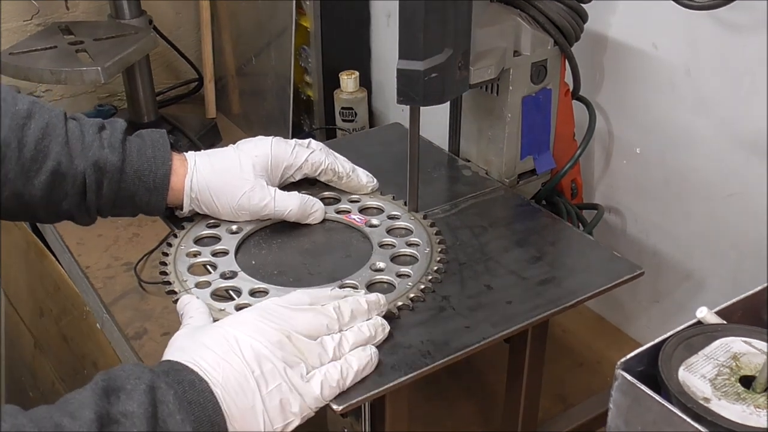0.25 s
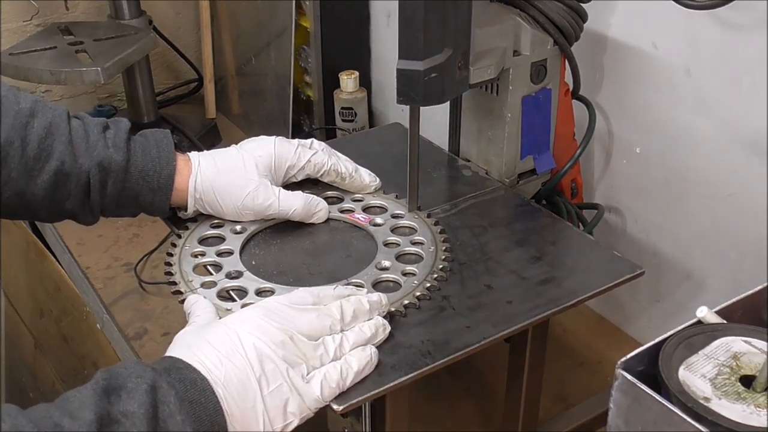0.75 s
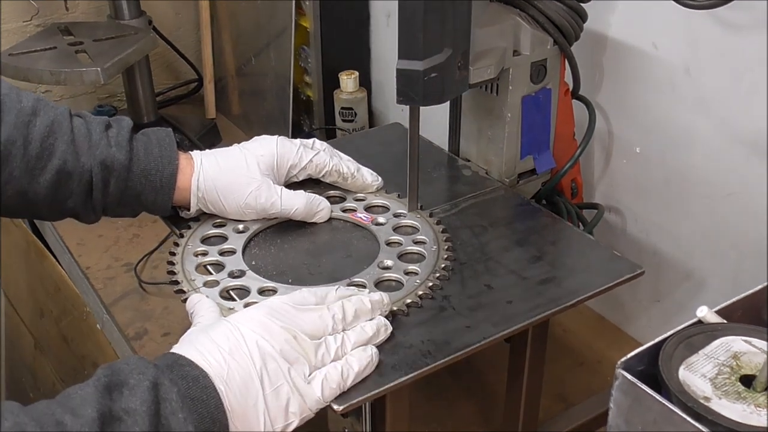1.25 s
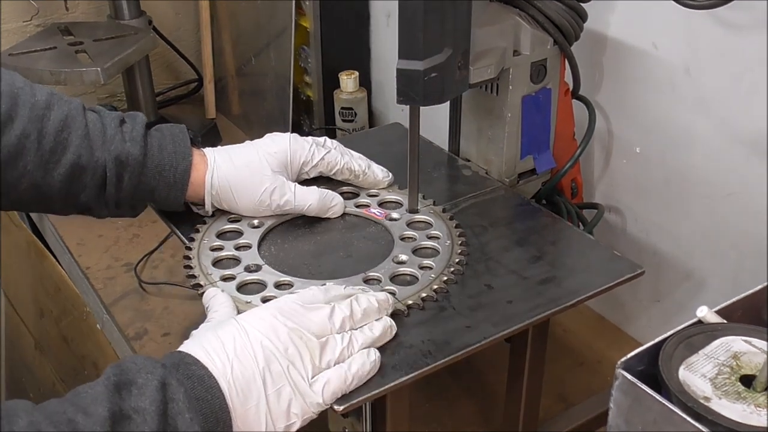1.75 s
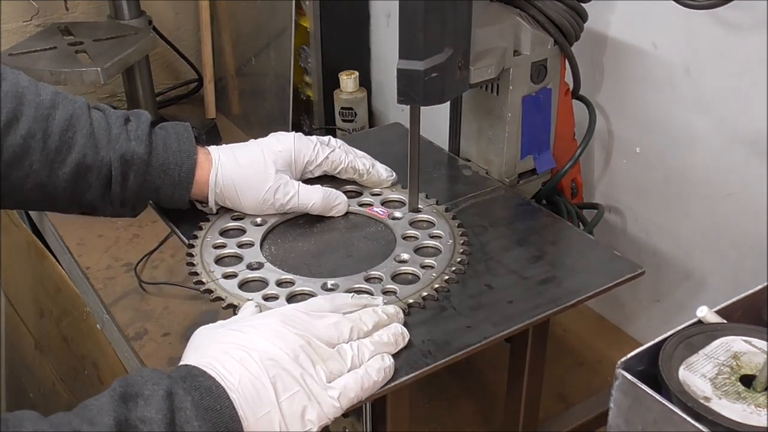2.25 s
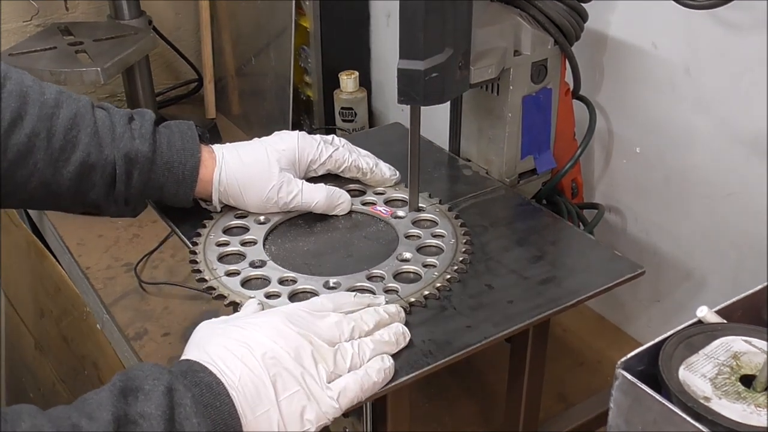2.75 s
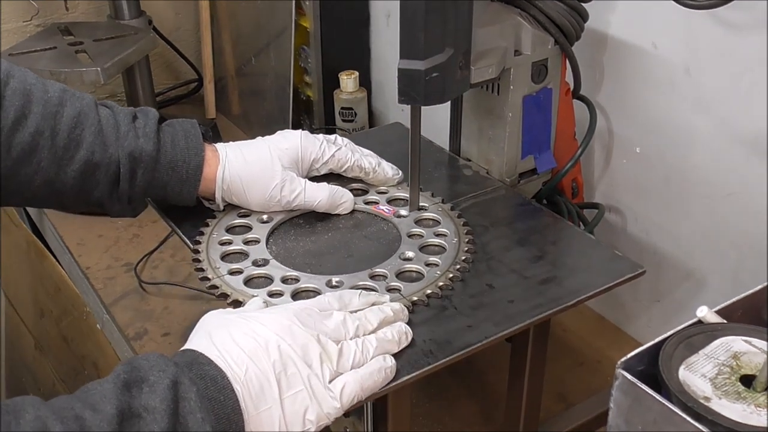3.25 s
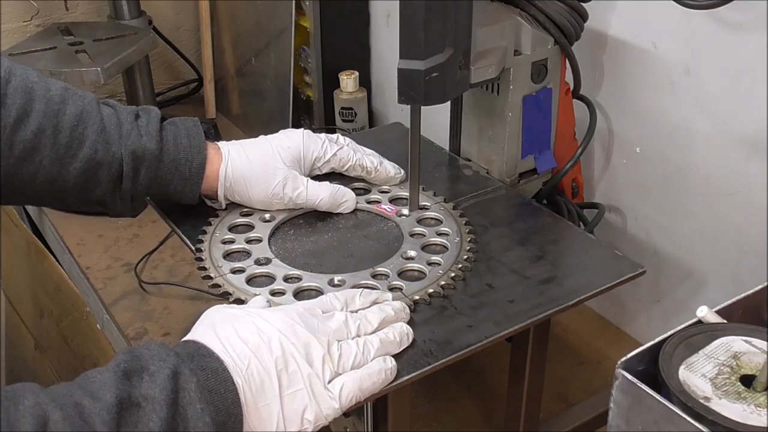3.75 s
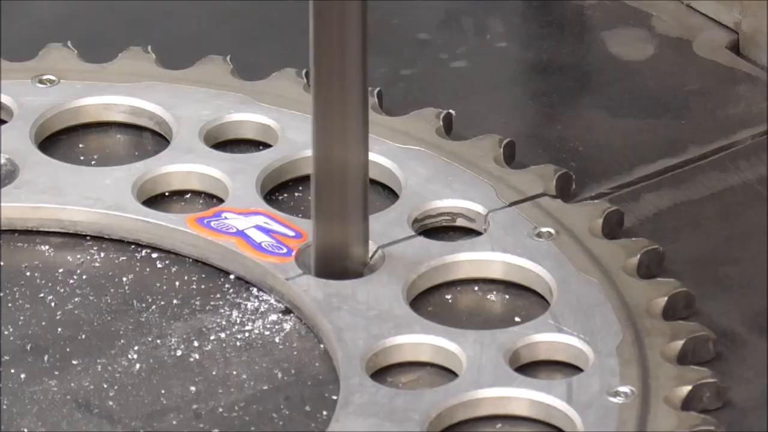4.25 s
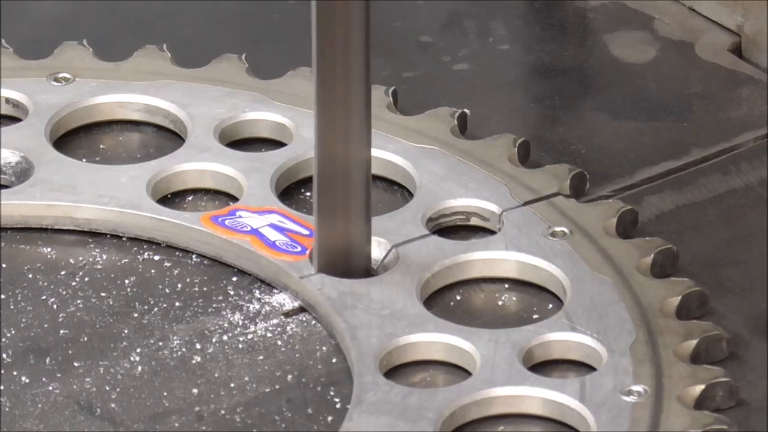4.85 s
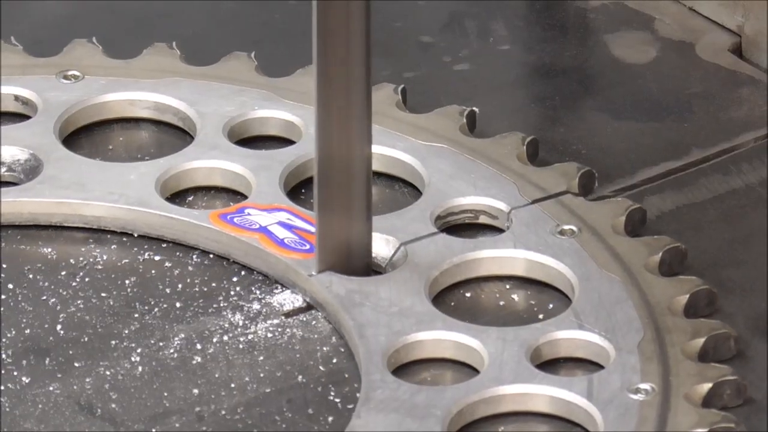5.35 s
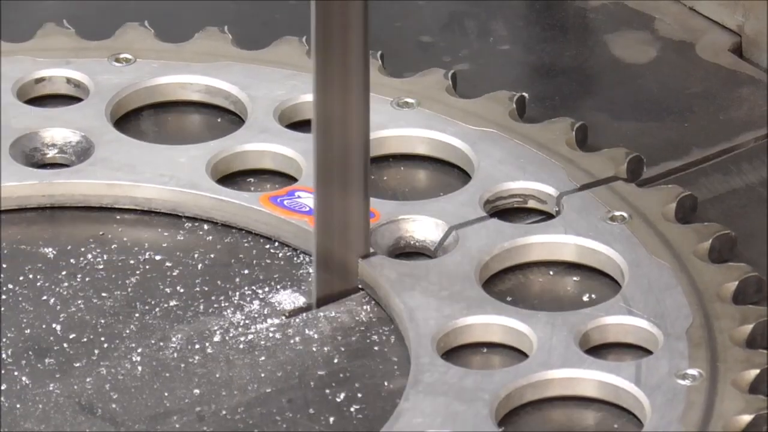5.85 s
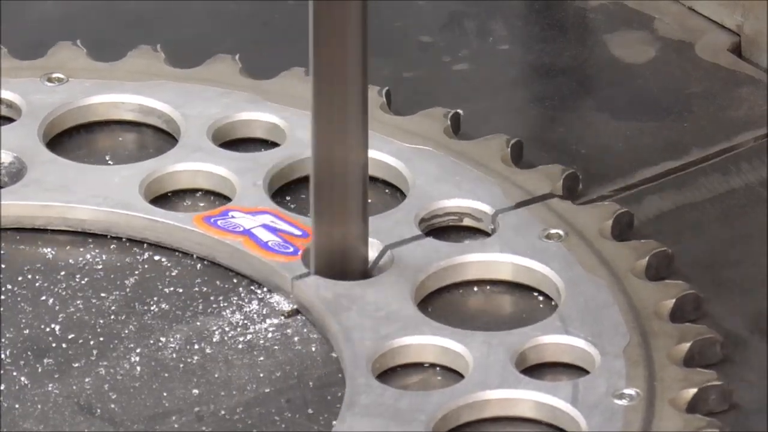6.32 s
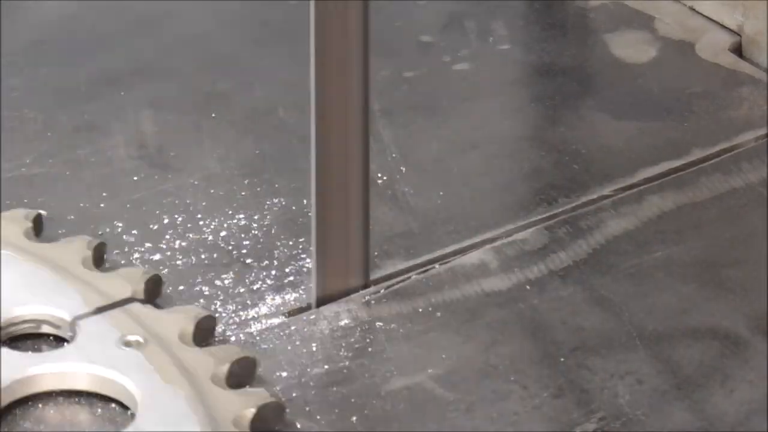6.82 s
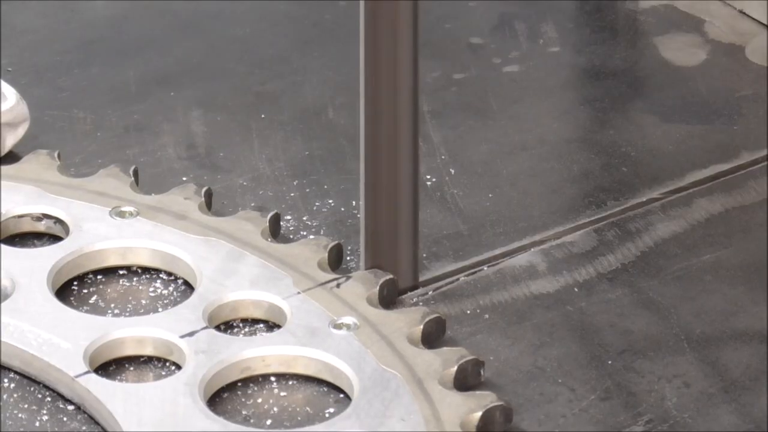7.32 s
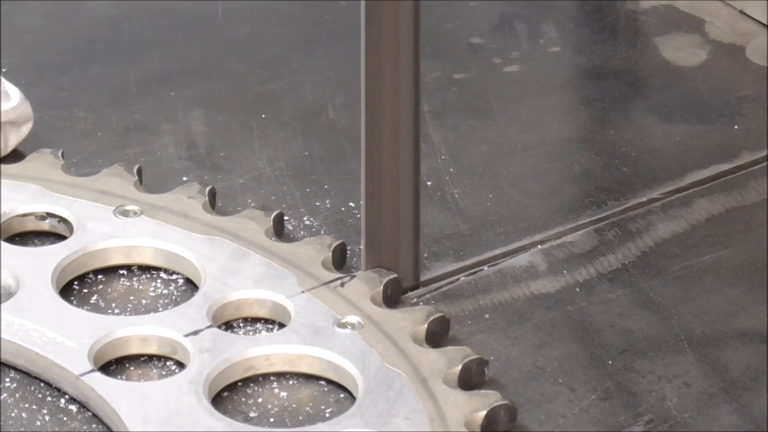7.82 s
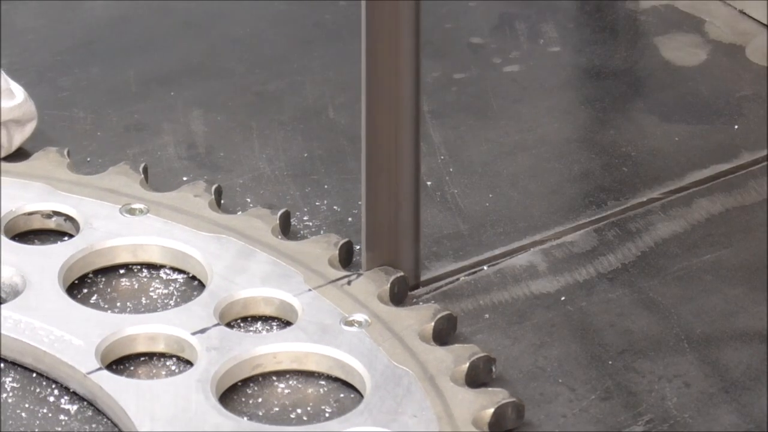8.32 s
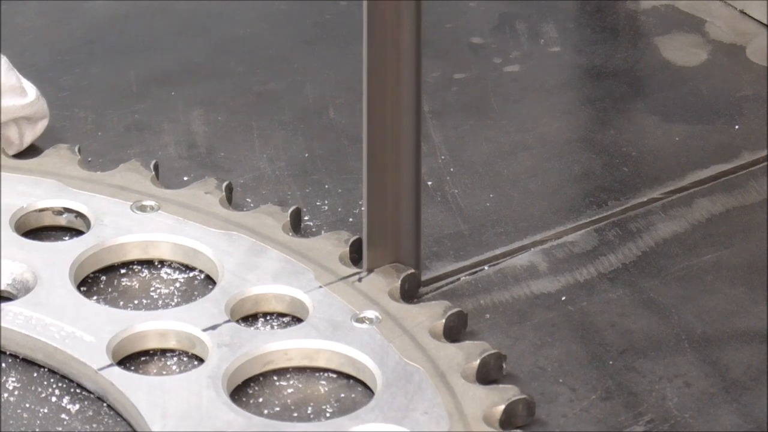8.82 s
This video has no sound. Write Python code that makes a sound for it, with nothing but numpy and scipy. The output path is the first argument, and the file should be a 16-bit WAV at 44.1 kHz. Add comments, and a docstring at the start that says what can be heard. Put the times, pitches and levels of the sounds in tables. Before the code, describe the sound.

A band saw whines and rasps through a metal sprocket, squealing as the blade binds, then suddenly sounds closer and brighter.

```python
"""A portable band saw, upright at a steel table, cuts a metal sprocket in a small workshop.
From a step away, the teeth whine at their passing rate and rasp through the resonances of blade and
table, over the buzz of the speed control. Almost at once the blade binds and squeals by stick-slip
friction; then the loosely held sprocket rattles. At 4.3 s the listening point jumps close. A high
blade mode whistles, the rattle comes and goes, and from 7.5 s the blade binds and squeals again."""
import sys
import numpy as np
from scipy import signal
from scipy.fft import rfft, irfft
from scipy.io import wavfile
from scipy.ndimage import uniform_filter1d

SR = 44100
rng = np.random.default_rng(int(sys.argv[2]) if len(sys.argv) > 2 else 0)


def transcribe(signal):
    """Save signal, clipped to [-1, 1], as a 16-bit WAV file at the path in sys.argv[1]."""
    frames = np.atleast_2d(signal).T
    limited = np.clip(frames, -1, 1)
    pcm = np.round(limited * 32767).astype(np.int16)
    wavfile.write(sys.argv[1], SR, pcm)


N = 400428
TIME, FREQ = np.arange(N) / SR, np.fft.rfftfreq(N, 1 / SR)
CLOSE_FROM_S, BIND_EDGE_S, RATTLE_EDGE_S = 4.299, .012, .03
TOOTH_HZ, BUZZ_HZ = 1365.2, 240.05


def amp(db):
    """Decibels to amplitude ratio."""
    return 10 ** (np.asarray(db) / 20)

def unit(x):
    """Normalisation to rms 1."""
    return x / np.sqrt(np.mean(x ** 2) + 1e-20)

def curve(rows):
    """Linear interpolation of a time table at every sample."""
    return np.interp(TIME, *np.transpose(rows))

def colour(points):
    """Interpolation of a spectrum table over log frequency."""
    hz, db = np.transpose(points)
    return np.interp(np.log(FREQ + 1), np.log(hz + 1), db)

def shaped(x, gain):
    """Zero-phase filtering by a gain for every frequency."""
    return irfft(rfft(x) * gain, N)

def wander(hz):
    """Random modulation: low-passed noise of rms 1."""
    return unit(shaped(rng.standard_normal(N), 1 / (1 + (FREQ / hz) ** 4)))

def ring(x, hz, width):
    """Resonance: x through one steep-sided peak, at rms 1."""
    return unit(shaped(x, 1 / (1 + ((FREQ - hz) / (0.37 * width)) ** 2)))

def angle(hz):
    """Phase as the integral of frequency."""
    return 2 * np.pi * np.cumsum(hz) / SR

def spell(start, end, edge):
    """A soft-edged gate, open from start to end."""
    return (np.tanh((TIME - start) / edge) - np.tanh((TIME - end) / edge)) / 2

def lagged(x, seconds):
    """First-order lag with this time constant."""
    pole = np.exp(-1 / (seconds * SR))
    return x[0] + signal.lfilter([1 - pole], [1, -pole], x - x[0])

def diffused(x, t60):
    """Diffusion: convolution with a decaying noise tail of energy 1."""
    t = TIME[:SR // 6]
    tail = rng.standard_normal(len(t)) * amp(-60 * t / t60)
    return signal.fftconvolve(x, tail / np.linalg.norm(tail))[:N]


# The push of the work into the teeth. Each row: time in seconds, load in dB.
PUSH = [(0, -2), (.69, -3.5), (.79, 0.2), (3.4, -0.28), (4.15, 0.64), (4.6, -0.6), (5.4, -0.22),
        (7.52, 0.82), (7.76, -5.5), (8.4, -7.5), (8.92, -0.5), (9.08, -1)]
# The teeth lose their bite. Each row: time in seconds, depth in dB, recovery in seconds.
LOST_BITES = [(0.405, 6.5, 0.042), (2.63, 2.5, 0.016), (2.725, 2, 0.041), (3.9, 4.5, 0.078),
              (5.885, 10.5, 0.0295), (6.65, 3.5, 0.038), (7.618, 0.5, .02), (8.6, 6, 0.03)]

def feed(let_go_s=.013):
    """Cutting load in dB: the push of the hands, with exponential recovery from each lost bite."""
    lost_db = sum(db * np.exp(-np.where(TIME < s, ((TIME - s) / let_go_s) ** 2, (TIME - s) / recovery))
                  for s, db, recovery in LOST_BITES)
    return curve(PUSH) - lost_db

def tooth_rate(feed_db, governor_s=0.1515, inertia_s=0.05, sag_hz_per_db=3.0, drag_hz=5.5):
    """Governed speed: a load change pulls the rate until the control catches up; friction lowers it."""
    load_change_db = lagged(feed_db - lagged(feed_db, governor_s), inertia_s)
    peak_s, period_s, swing_hz = 1.49, .48, 12.32  # the speed hunts for a moment
    hunting = spell(peak_s - .25 * period_s, peak_s + 1.5 * period_s, period_s / 10)
    hunt = swing_hz * np.cos(2 * np.pi * (TIME - peak_s) / period_s) * hunting
    friction = flank_friction()
    drag = drag_hz * friction / friction.max()
    return TOOTH_HZ - sag_hz_per_db * load_change_db - drag + hunt + 1.28 * wander(4.23)


# Broad spectrum of the rasp. Each row: frequency in Hz, relative density in dB.
RASP_SPECTRUM = [(30, -53), (170, -52), (300, -46.5), (500, -27), (760, -19.5), (950, -7.5), (1500, -9.5),
                 (2600, -5.5), (4400, 1.23), (6600, -1.67), (8500, -3), (10200, -9), (12500, -4),
                 (15700, -3.5)]
# Modes of table, housing, sprocket and blade. Each row: frequency in Hz, width in Hz, boost in dB.
BODY_MODES = [(223, 48, 8.5), (343, 80, 7), (578, 45, 5.5), (972, 81, 2), (1296, 323, 9), (1627, 118, 8),
              (1871.5, 225, 15), (2072, 118, 6.5), (2318, 303, 9), (2730, 90, 8), (3044, 421, 12.5),
              (3385, 200, 8.5), (3715, 230, 4.5), (4070, 380, 4), (4933, 440, 7.5), (5760, 720, 4),
              (6110, 170, 3), (6860, 110, 5.5), (7620, 310, 4.5), (8140, 64, 6), (13050, 640, 1.5),
              (14420, 420, 10), (15500, 290, 10.5), (15800, 178, 9)]
# Treble hiss against the rest of the rasp. Each row: time in seconds, gain in dB.
HISS_GAIN = [(0, .6), (2.9, -0.5), (4.4, 1.6), (7.65, 1), (8, 3.5), (8.38, 5), (8.65, -.5)]

def rasp(tooth_phase, feed_db, level_db=-20.5, body_hz=2600, hiss_hz=9000):
    """Forced vibration: each tooth tears a chip, and the scrape of noise rings saw and table."""
    chips = rng.standard_normal(N) * (1 + 0.26 * np.cos(tooth_phase))
    chips = chips + amp(-12) * diffused(chips, t60=0.14)  # the many small modes of the steel plate
    peaks_db = sum(db * 2 ** (-(2 * (FREQ - hz) / width) ** 2) for hz, width, db in BODY_MODES)
    scrape = unit(shaped(chips, amp(colour(RASP_SPECTRUM) + peaks_db)))
    low = 1 / (1 + (FREQ / body_hz) ** 8)
    high = 1 - 1 / (1 + (FREQ / hiss_hz) ** 8)
    # the treble throbs with the pulses of motor current
    throb = (1 + .12 * np.cos(2 * np.pi * 2 * BUZZ_HZ * TIME)) * amp(0.7 * wander(45))
    hiss = shaped(scrape, high) * amp(curve(HISS_GAIN)) * throb
    body = shaped(scrape, low) * amp(-0.68) + shaped(scrape, 1 - low - high)
    flutter_db = 0.52 + 0.13 * np.maximum(-feed_db, 0)  # under a light feed the teeth skip
    return (body + hiss) * amp(level_db + feed_db + flutter_db * wander(16.4))


# Overtones of the tooth strikes. Each row: harmonic number, relative level in dB.
TOOTH_HARMONICS = [(2, -46), (3, -36.5), (5, -58), (6, -39.5)]

def whine(tooth_phase, feed_db, hum_db=-39.5, shimmer_db=2):
    """Periodic impacts give a harmonic series; harder feed sharpens them and lifts the overtones."""
    loose_db = sum(db * spell(start, end, RATTLE_EDGE_S) for start, end, _, _, db in RATTLES)
    hum = amp(hum_db + .55 * feed_db + loose_db + shimmer_db * wander(11)) * np.sin(tooth_phase)
    overtones = sum(amp(db + shimmer_db * wander(21)) * np.sin(k * tooth_phase)
                    for k, db in TOOTH_HARMONICS)
    return np.sqrt(2) * (hum + overtones * amp(2 + 1.04 * feed_db))


# Spectral lines of the motor buzz. Each row: harmonic number, relative level in dB.
BUZZ_HARMONICS = [(2, -70), (8, -66), (10, -43), (12, -46), (24, -47), (26, -52), (30, -50), (45, -55),
                  (49, -56), (51, -51), (57, -50), (59, -55), (61, -47.5), (63, -54)]

def buzz(feed_db, level_db=-1, shimmer_db=0.3, strain=2.3):
    """Current chopped by the speed control gives harmonics of steady pitch that grow with the load."""
    phase = 2 * np.pi * BUZZ_HZ * TIME
    load_db = uniform_filter1d(feed_db, size=SR // 5)
    lines = sum(amp(db - shimmer_db * wander(7.3)) * np.sin(k * phase + 2 * np.pi * rng.random())
                for k, db in BUZZ_HARMONICS)
    return np.sqrt(2) * amp(level_db + strain * load_db) * lines


# Background noise of the workshop. Each row: frequency in Hz, relative density in dB.
RUMBLE_SPECTRUM = [(20, 2), (60, 0), (150, -7), (400, -20), (2000, -45)]

def rumble(level_db=-93, side_db=-5):
    """Ambient noise: a quiet rumble, partly correlated between the ears."""
    spectrum = amp(colour(RUMBLE_SPECTRUM))
    middle, side = (unit(shaped(rng.standard_normal(N), spectrum)) for _ in range(2))
    return amp(level_db) * np.array([middle + amp(side_db) * side, middle - amp(side_db) * side])


# Tone colour a step away against close by. Each row: frequency in Hz, gain in dB.
FAR_COLOUR = [(150, 6.5), (330, 6.5), (700, -0.1), (1050, -1), (1400, -4.5), (2000, -6.5), (3200, -8),
              (4500, -10), (6500, -10), (10000, -10.5), (12000, -10), (15500, -8.5)]
# Stereo width a step away. Each row: frequency in Hz, side against middle in dB.
FAR_WIDTH = [(60, -21), (300, -39), (750, -26), (1300, -13), (3100, -9), (7000, -13.5), (15000, -13.5)]
# The saw stands a little to the right. Each row: frequency in Hz, left minus right in dB.
FAR_BALANCE = [(380, 0), (750, -0.5), (1290, -5.5), (2000, -2), (3200, -3), (5500, 0), (12000, -0.5)]

def from_afar(saw, room_t60=0.38):
    """Decorrelation: a step away, wall reflections spread the duller sound between the ears."""
    middle = shaped(saw, amp(colour(FAR_COLOUR)))
    side = shaped(diffused(middle, room_t60), amp(colour(FAR_WIDTH)))
    lean = amp(colour(FAR_BALANCE) / 2)
    return np.array([shaped(middle + side, lean), shaped(middle - side, 1 / lean)])

def wheel(level_db=-76, hz=218, period_s=0.18, first_s=0.018):
    """Rotational pulsing: the band wheel knocks softly once a turn, heard only from a step away."""
    knocks = np.exp(10 * (np.cos(2 * np.pi * (TIME - first_s) / period_s) - 1))
    return amp(level_db) * knocks * np.sin(2 * np.pi * hz * TIME) * (TIME < CLOSE_FROM_S)


# The blade binds in the kerf. Each row: start and end in seconds, pitch in Hz, then relative
# levels in dB of the squeal, its lower mode and the rubbing.
BINDINGS = [(0.019, 0.616, 7717, -29, -4.5, -38.5), (1.785, 1.937, 7700, -37, -3, -62.5),
            (2.22, 3.842, 7770, -36.5, 0.5, -61), (7.509, 8.355, 7700, -29.5, -30, -37.5),
            (8.355, 9.2, 7715, -31, -30, -39.5)]
# The strongest stick-slip bursts. Each row: time in seconds, relative level in dB, length in seconds.
SLIP_BURSTS = [(0.098, -26, 0.038), (0.177, -28.5, 0.074), (0.25, -30, 0.054), (0.494, -26.5, .066),
               (7.543, -21, 0.02), (7.568, -19, 0.028), (7.686, -20, 0.036), (7.762, -24, 0.047),
               (8.101, -21.5, 0.041), (8.191, -25, 0.021), (8.289, -20, 0.049), (8.433, -24, 0.015),
               (8.525, -21, 0.025), (8.567, -20, 0.03), (8.705, -17, 0.012), (8.743, -16, 0.017),
               (8.833, -24, .03), (8.928, -19, 0.029), (8.965, -21, 0.023), (9.036, -21.5, 0.074)]

def squeal(far_burst_db=6, close_burst_db=-1, jitter_hz=26):
    """Stick-slip oscillation: the bound blade sings in bursts, at times with a mode an octave lower."""
    starts, _, pitch_hz, _, lower_share_db, _ = np.transpose(BINDINGS)
    bind = np.maximum(np.searchsorted(starts - 2 * BIND_EDGE_S, TIME) - 1, 0)
    held = sum(amp(db) * spell(start, end, BIND_EDGE_S) for start, end, _, db, _, _ in BINDINGS)
    power = (held * amp(4.5 * np.minimum(wander(20), 1))) ** 2
    for s, db, length in SLIP_BURSTS:
        near = abs(TIME - s) < 2 * length
        strength = amp(db + (far_burst_db if s < CLOSE_FROM_S else close_burst_db))
        power[near] += strength ** 2 * 2 ** (-8 * ((TIME[near] - s) / length) ** 2)
    phase = angle(pitch_hz[bind] + jitter_hz * wander(102.4))
    lower = amp(-4.5 + 3 * wander(64)) * np.sin(phase / 2) + amp(-20) * np.sin(1.5 * phase)
    tone = np.sin(phase) + amp(-19) * np.sin(2 * phase) + amp(lower_share_db)[bind] * lower
    return np.sqrt(2 * power) * tone * amp(2 * wander(120))

def flank_friction():
    """Sliding friction: its strength on the flank of the blade while it binds."""
    return sum(amp(db) * spell(start, end, BIND_EDGE_S) for start, end, _, _, _, db in BINDINGS)


# Blade modes woken by rubbing. Each row: frequency in Hz, width in Hz, then relative levels in dB
# while sawing forward and while drawn back out of the kerf.
BLADE_MODES = [(6250, 350, -16, 1), (6990, 210, -12, -3), (7670, 280, 7, 3), (8370, 180, 0, 2),
               (8700, 290, -3, -11), (9070, 160, -13, -2), (9670, 150, -6, -15), (10600, 120, -20, -11),
               (11560, 150, -11, -9), (12900, 130, -13, -8), (13800, 200, -14, -6), (14100, 180, -9, 0),
               (15500, 190, -6, 3)]

def rub(feed_db, level_db=-1, flutter_db=2.5, grit_db=1.6, surge_db=1.2):
    """Frictional excitation: uneven rubbing rings the blade, more so when the teeth are unloaded."""
    friction = rng.standard_normal(N)
    modes = np.zeros(N)
    for hz, width, forward_db, back_db in BLADE_MODES:
        mode_db = np.where(TIME < CLOSE_FROM_S, forward_db, back_db)
        modes += amp(mode_db + flutter_db * wander(44)) * ring(friction, hz, width)
    slack_db = -0.17 * uniform_filter1d(feed_db, size=SR // 5)
    uneven_db = grit_db * wander(140) + surge_db * wander(15)
    return modes * flank_friction() * amp(level_db + slack_db + uneven_db)


# The sprocket is held less firmly. Each row: start and end in seconds, levels of the lower and
# upper mode in dB, lift of the whine's fundamental in dB.
RATTLES = [(0.755, 0.932, -71, -35.5, 0.5), (4.065, 4.28, -79, -62, 3.5), (4.31, 4.45, -56, -62, 1.5),
           (4.596, 5.77, -59, -62, 0), (6, 6.387, -76.5, -53, 4.5), (7.28, 7.76, -53, -48, 5),
           (8.587, 9.2, -63, -45, 4.5)]

def rattle(low_hz=637, high_hz=1289, rest_db=-53):
    """Random excitation: the sprocket rattles on the table in two modes; the upper never quite stops."""
    low_gain = sum(amp(db) * spell(start, end, RATTLE_EDGE_S) for start, end, db, _, _ in RATTLES)
    high_gain = sum(amp(db) * spell(start, end, RATTLE_EDGE_S) for start, end, _, db, _ in RATTLES)
    knocks = rng.standard_normal(N)
    low = unit(ring(knocks, low_hz, width=45) + amp(-2) * ring(knocks, low_hz, width=230))
    high = ring(knocks, high_hz, width=26)
    return (low_gain * low + (amp(rest_db) + high_gain) * high) * amp(2 * wander(50))


# The faint side signal heard close by. Each row: frequency in Hz, side against middle in dB.
FAINT_SIDE = [(200, -42), (640, -51), (1400, -73), (3100, -32), (7000, -64), (15000, -49.5)]

def from_close(saw, side_t60=0.4):
    """Close by, the saw sounds almost mono, with only a faint side signal that varies with frequency."""
    side = shaped(diffused(saw, side_t60), amp(colour(FAINT_SIDE)))
    return np.array([saw + side, saw - side])


# Soft, low ticks. Each row: time in seconds, peak level in dB.
TICKS = [(4.299, -42), (7.103, -44)]

def ticks(width_s=0.0004):
    """A Gaussian pulse holds little treble, so each tick sounds dull."""
    return sum(amp(db) * np.exp(-((TIME - s) / width_s) ** 2) for s, db in TICKS)


# A high blade mode sings. Each row: start and end in seconds, frequency and width in Hz, level in dB.
WHISTLES = [(5.05, 5.8, 11540, 75, -41), (7.85, 8.44, 15000, 260, -28)]

def whistle(edge_s=0.11, flutter_db=3):
    """Narrow-band resonance: single blade modes turn noise into thin, fluttering whistles."""
    return sum(amp(db + flutter_db * wander(35)) * spell(start, end, edge_s)
               * ring(rng.standard_normal(N), hz, width) for start, end, hz, width, db in WHISTLES)

def scene(jitter_hz=3, spacing_rad=0.099):
    """Superposition: the sounds of one saw under one feed, heard from a step away, then close by."""
    feed_db = feed()
    tooth_phase = angle(tooth_rate(feed_db) + jitter_hz * wander(47.5))
    tooth_phase += spacing_rad * wander(270)  # the teeth are not quite evenly spaced
    cutting = rasp(tooth_phase, feed_db) + whine(tooth_phase, feed_db)
    saw = cutting + buzz(feed_db) + squeal() + rub(feed_db) + rattle() + whistle() + wheel()
    saw *= signal.windows.tukey(N, .001)
    close = (1 + np.tanh((TIME - CLOSE_FROM_S) / .0005)) / 2
    return (1 - close) * from_afar(saw) + close * from_close(saw) + ticks() + rumble()

def record(dry, cutoff_hz=15745):
    """Band limiting: a steep low-pass removes the highest treble."""
    lowpass = signal.firwin(2001, cutoff_hz, window=("kaiser", 9), fs=SR)
    return signal.oaconvolve(dry, lowpass[None], "same")


dry = scene()
out = record(dry)
transcribe(out)
```